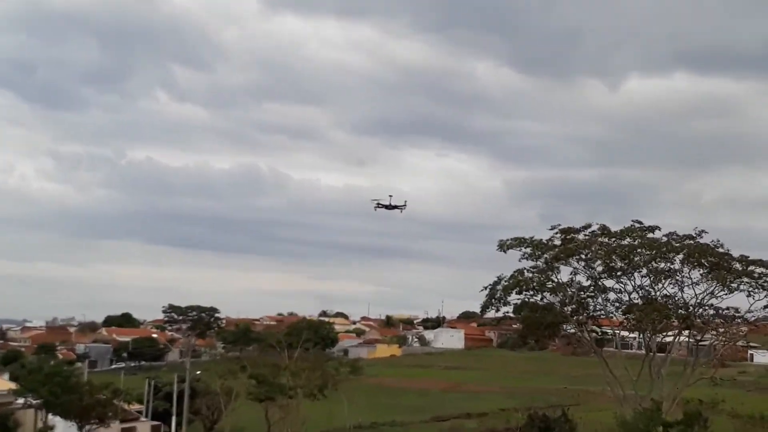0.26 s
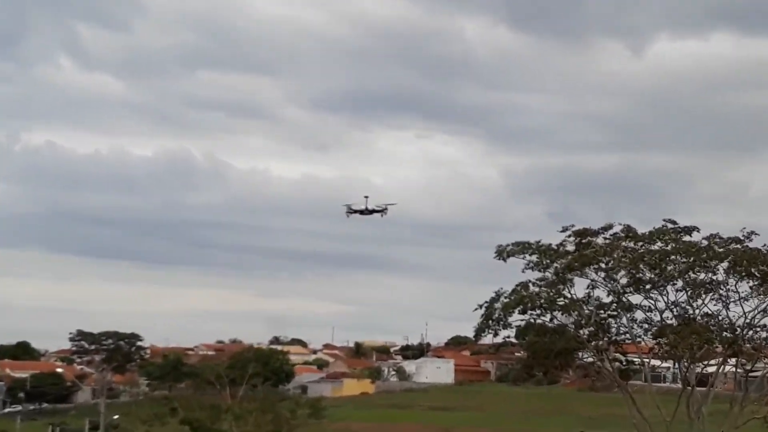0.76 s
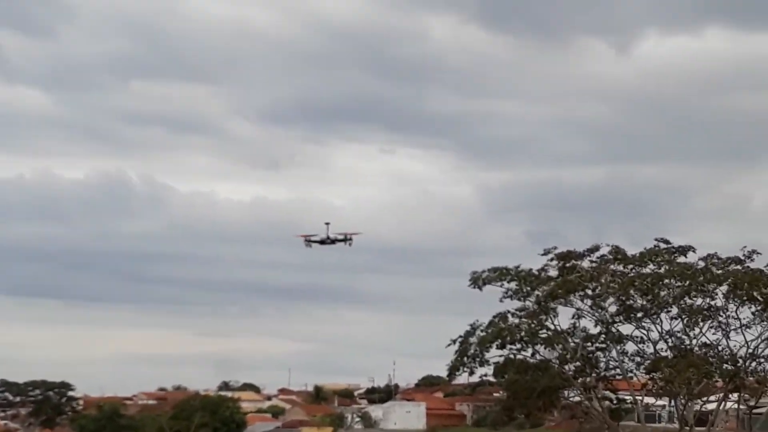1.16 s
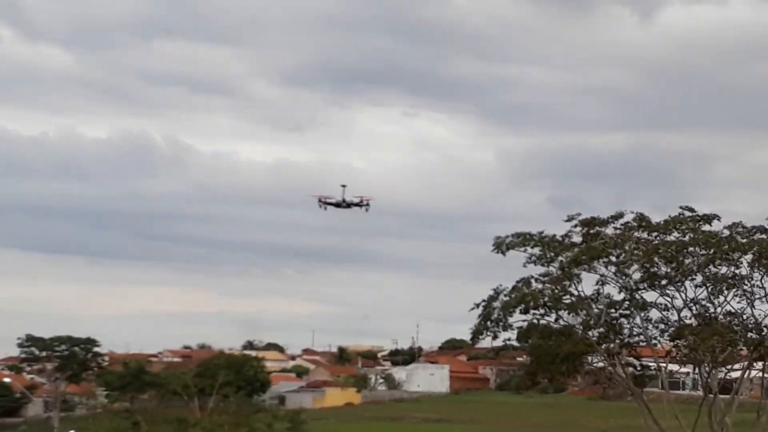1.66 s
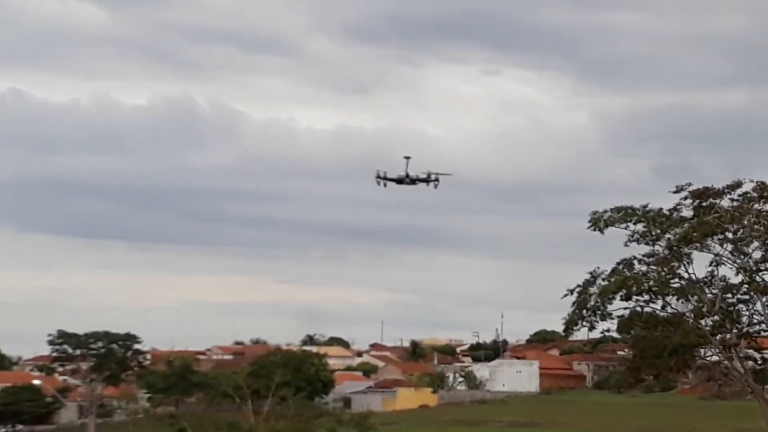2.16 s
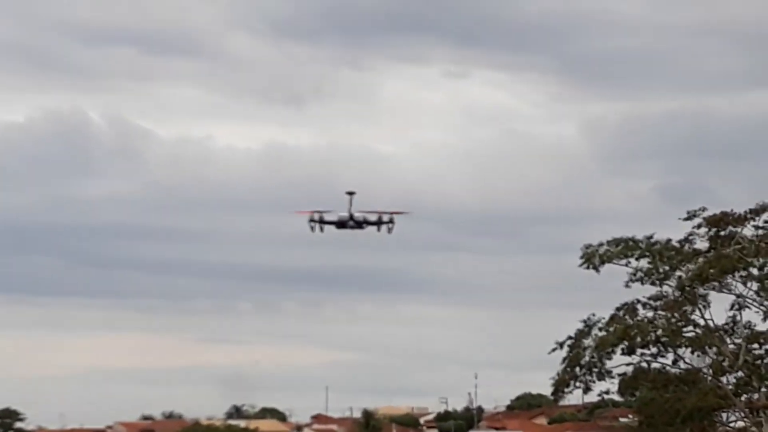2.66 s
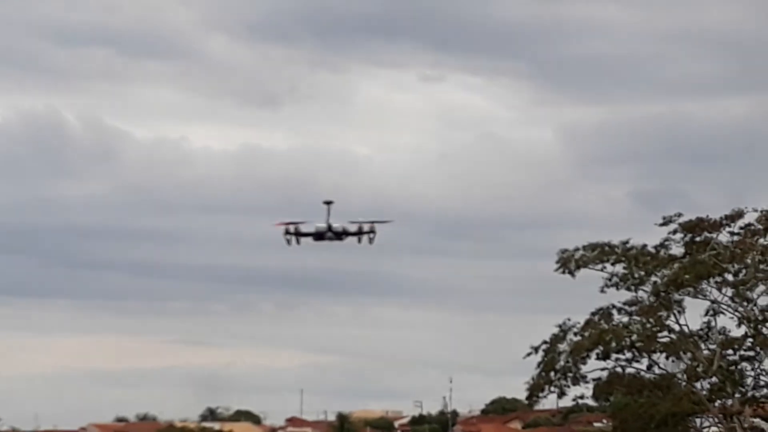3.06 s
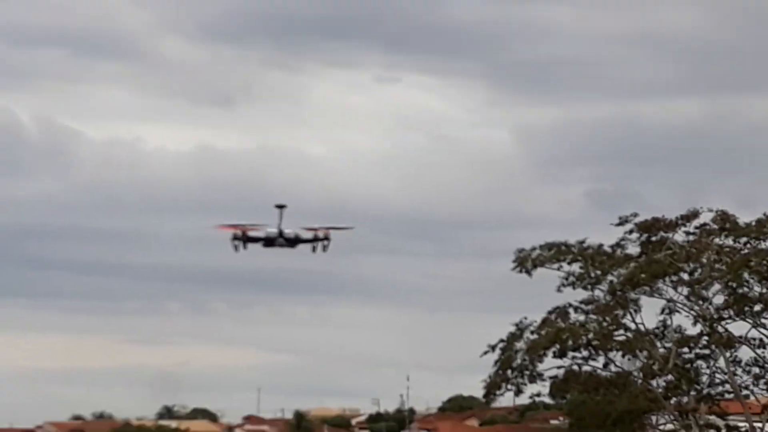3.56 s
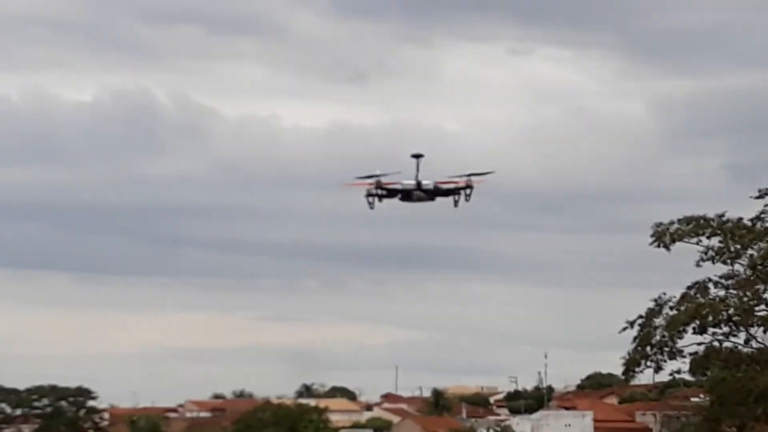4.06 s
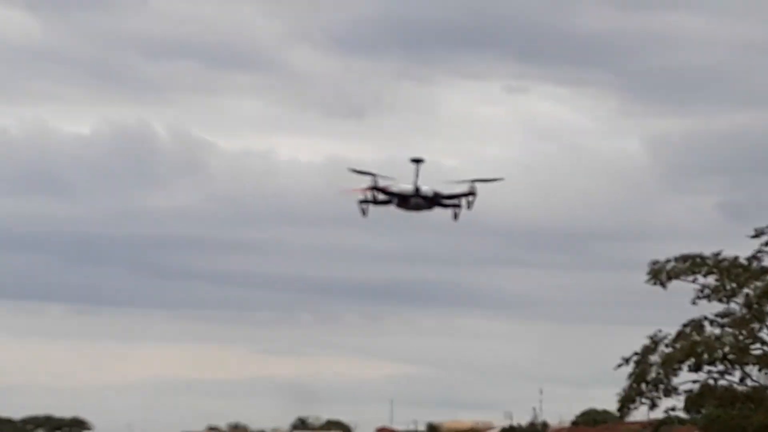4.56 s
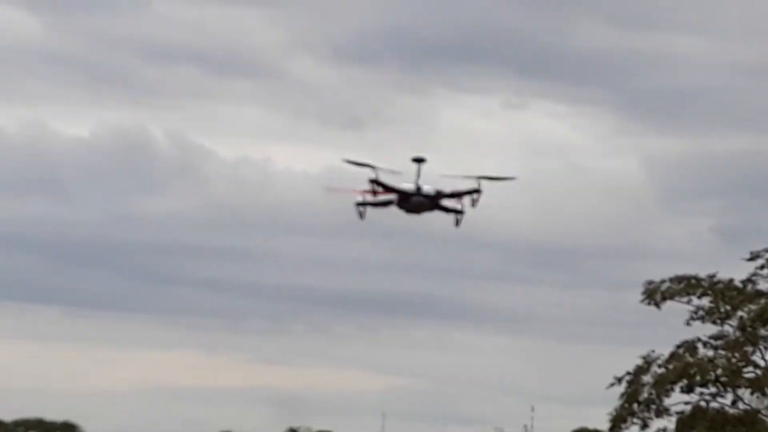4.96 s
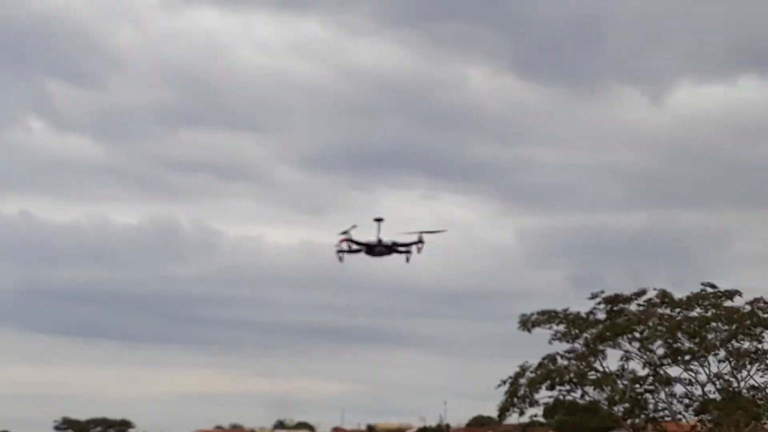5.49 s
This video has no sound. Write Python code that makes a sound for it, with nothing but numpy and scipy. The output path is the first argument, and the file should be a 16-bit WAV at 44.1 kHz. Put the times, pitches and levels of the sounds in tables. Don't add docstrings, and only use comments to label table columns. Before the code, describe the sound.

Steady airy drone buzz with thin motor whine grows louder over about six seconds, interrupted by low, irregular wind bumps.

```python
import sys
import numpy as np
from scipy import signal
from scipy.fft import rfft, irfft
from scipy.io import wavfile
from scipy.ndimage import uniform_filter1d, map_coordinates

SR = 44100
rng = np.random.default_rng(int(sys.argv[2]) if len(sys.argv) > 2 else 0)


def digitize_waveform(pressure):
    field = np.atleast_2d(pressure).T
    bounded = np.clip(field, -1, 1)
    quanta = np.round(bounded * 32767).astype(np.int16)
    wavfile.write(sys.argv[1], SR, quanta)


def to_linear_factor(level_db):
    exponent = np.asarray(level_db, float) / 20
    return 10 ** exponent


N = 252693
T = np.arange(N) / SR

# time [s], nearness [dB], wake turbulence [dB], blade load [dB].
FLIGHT = [(0, -2, 1, 0), (.67, -1.5, 2.5, 1), (.95, -4.5, -0.5, 1), (1.3, -4, 0.5, -4.5),
          (2.1, -2.5, -3, -7), (2.33, -1.5, 1, -10), (2.5, -2, -2, -12), (3.08, -.5, 1, 6.5),
          (3.32, .5, -0.5, -7.5), (3.61, 1, 3, 6.5), (3.97, 4, 1, 2.5), (4.47, 6, -5, 3),
          (4.76, 6.5, -0.5, 3), (5.03, 9.5, 3, 4.5), (5.12, 9.5, -0.5, 3), (5.38, 8.5, -0.5, -6),
          (5.63, 7, -3.5, -4), (5.73, 8, -3, -13)]

# time [s], motor whine [Hz], whine level [dB].
LEAD_ROTOR = [(0, 3830, -55), (.23, 3685, -60), (.6, 3830, -58), (.92, 3935, -54), (1.4, 3855, -58),
              (1.7, 3795, -57), (1.94, 3635, -63), (2.3, 3710, -58), (2.7, 3700, -59), (3.16, 3790, -54),
              (3.6, 3865, -52), (3.88, 3925, -57.5), (4.45, 3815, -49.5), (4.7, 3625, -56),
              (5.04, 3950, -48), (5.27, 3700, -62), (5.52, 3710, -62), (5.67, 3860, -47)]
# middle [s], change of whine [Hz], half length [s].
CORRECTIONS = [
    (1.19, -90, .05),
    (1.55, -115, .055),
    (2.09, 25, .05),
    (2.2, -45, .04),
    (2.58, -20, .05),
    (2.94, 25, .04),
    (3.33, -105, .07),
    (4.03, -125, .055),
    (4.25, -100, .1),
    (4.87, 45, .07),
]
POLE_STEPS = 42
INERTIA_S, LEAD_WOBBLE_HZ, WHINE_DB_PER_HZ = .04, 8, .03

# time [s], shaft rate [Hz], whine level [dB].
SLOW_ROTOR = [(0, 76, -70), (.43, 74.9, -68), (.63, 77.6, -65), (.85, 74.8, -71), (1.4, 75, -72),
              (1.65, 76.6, -67), (2.83, 77.6, -66), (3.4, 75.5, -73), (3.85, 79.5, -66), (4.23, 73.5, -73),
              (4.8, 75.3, -67), (5.05, 79.7, -64), (5.45, 74.6, -70)]
# time [s], shaft rate [Hz], whine level [dB].
FAST_ROTOR = [(0, 90.9, -69), (1.2, 89.8, -64), (1.5, 93.7, -63), (1.85, 92.6, -65.5), (2.2, 92.05, -56),
              (2.9, 93.5, -69), (3.7, 94.9, -66), (4.1, 91.3, -69), (4.45, 92.46, -59), (5.73, 92.8, -63)]
SLOW_WOBBLE, FAST_WANDER, FOURTH_WANDER = .004, .006, .015
FOURTH_SHAFT_HZ = 81.4

# multiple of shaft rate, level [dB].
THRUM = [(2, -11.5), (4, -7.5), (5, -24), (6, -6), (8, -6.5), (10, -7), (12, -17.5), (14, -12), (16, -9.5),
         (18, -15), (20, -13)]
THRUM_SHARE_DB = [-2.5, -4, -6., -8]
THRUM_DB, THRUM_DB_PER_NEAR_DB = -56, 0.87

# frequency [Hz], density [dB per Hz].
HISS = [(150, -14), (250, -8), (380, -2), (1200, -7), (2200, -6.5), (3400, -9), (4500, -7), (5200, -7.5),
        (8900, -7.5), (9500, -10.5), (11000, -11), (13000, -13.5), (15700, -18), (15900, -28)]
# answer to nearness [dB per dB], answer to turbulence [dB per dB].
HISS_ANSWER = [(.6, 1.01), (.95, -0.1), (1.01, 0.28), (1.3, 0.22)]

# time [s], delay [ms], echo strength [0-1].
SURFACE_ECHO = [(0, 1.82, .55), (2, 1.83, .6), (3.5, 1.83, .6), (4.2, 1.95, .65), (4.6, 2.1, .45),
                (4.9, 2.25, .55), (5.73, 2.32, .5)]
# time [s], brightened frequency [Hz], strength [0-1].
HOUSING = [(0, 11300, 0), (2.4, 10700, 0.1), (3, 11500, 0), (3.7, 11000, 0.16), (4.1, 11300, 0.1),
           (4.6, 11920, 0), (4.75, 10700, 0.3), (5.1, 12100, 0.1), (5.73, 12460, 0.1)]

# multiple of shaft rate, level over the main whine [dB].
WHINE = [(42, 0), (56, -13), (63, -14), (84, -13)]
# frequency [Hz], level [dB].
BELL = [(4100, -19), (4280, 3), (4450, -4.5), (4560, 0), (4750, -20)]

# time [s], first tone [Hz], first level [dB], second level [dB].
SWITCHING = [(0, 14216, -65, -72), (.9, 14181, -69, -77), (1.7, 14204, -62, -63), (2.5, 14224, -63, -67),
             (3.15, 14223, -71, -66), (3.6, 14222, -59, -66), (3.95, 14214, -63, -67),
             (4.7, 14205, -54, -57), (5.4, 14152, -57, -55)]
CLOCKS = [1, 1.02235, 1.05152, .98684]
# starting level [dB], rise [dB per s].
HIDDEN_PAIR = [(-83, 2.1), (-90, 2.8)]

# time [s], rumble level [dB].
GUST = [(0, -42), (.17, -43), (.24, -52), (.4, -40.5), (.93, -44), (1.0, -34.5), (1.13, -42.5),
        (1.56, -44.5), (1.63, -30), (2.2, -31.5), (2.32, -31.5), (3.75, -43), (4.1, -61.5), (4.23, -36.5),
        (4.6, -41), (5.45, -47), (5.52, -31.5), (5.73, -37)]
# middle [s], peak [dB], ring [Hz].
EDDIES = [(.062, -25, 103), (.297, -19.5, 162), (0.405, -24.5, 133), (.599, -27, 142), (0.969, -24, 173),
          (1.037, -23, 192), (1.199, -30, 158), (1.471, -25, 153), (1.628, -23, 310), (1.756, -30, 245),
          (1.809, -31, 176), (1.839, -11.5, 185), (1.865, -16.5, 185), (1.959, -18.5, 224),
          (2.03, -24, 198.3), (2.328, -17, 135), (2.35, -19, 137), (2.408, -20, 182), (2.452, -20, 136),
          (2.663, -22.5, 130), (2.843, -26, 142), (2.949, -25, 210), (3.054, -23.5, 109), (3.11, -28, 109),
          (3.324, -26.5, 80), (4.529, -23.5, 156), (4.823, -23, 161), (5.025, -27, 142), (5.518, -25.5, 98),
          (3.644, -26.5, 96)]
# middle [s], peak [dB], ring [Hz].
CRACK = (2.318, -25.5, 520.)
# frequency [Hz], density [dB per Hz].
WIND = [(20, -23), (40, -1.5), (63, 0.5), (90, 5), (125, 2.5), (170, -3), (230, -11)]
# frequency [Hz], density [dB per Hz].
WIND_EDGE = [(180, -7), (260, -1), (350, -5), (500, -19), (800, -23.5)]
WAKE_DB, WAKE_TOP_DB, WAKE_S = -16.5, -39.5, 0.034
SHED_PER_S, SHED_CLEAR_S = 16, .02
SHED_OVER_DB, SHED_SCATTER_DB, SHED_DB_PER_OCTAVE = 9, 2.5, -7
SHED_HZ, SHED_HZ_PER_DB, SHED_OCTAVES = 159.5, 5.5, 0.48

# frequency [Hz], density [dB per Hz].
SIDE_HISS = [(300, -0.5), (2000, 3), (6000, -10.5), (11000, -6.5), (15000, 5)]
# frequency [Hz], level [dB].
PORT = [(20, 0), (9000, 0), (9600, -4), (10300, 0), (22050, 0)]


def curves(table):
    s, *columns = np.transpose(table)
    return [np.interp(T, s, c) for c in columns]


def unit(x):
    return x / np.sqrt(np.mean(x ** 2))


def colour(x, points):
    hz, db = np.transpose(points)
    bins = np.log(np.fft.rfftfreq(N, 1 / SR) + 1)
    gain = to_linear_factor(np.interp(bins, np.log(hz), db, -120, -120))
    return irfft(rfft(x) * gain, N)


def walk(rate):
    hold = int(SR / rate)
    steps = rng.standard_normal(int(N / SR * 400))[:N // hold + 1]
    slewed = uniform_filter1d(np.repeat(steps, hold), hold)
    return 1.3 * uniform_filter1d(slewed, hold)[:N]


def turns(hz):
    return 2 * np.pi * np.cumsum(hz) / SR


def tone(angle, flicker_db, slip, rate):
    level = np.sqrt(2) * to_linear_factor(flicker_db * walk(rate))
    return level * np.sin(angle + slip * walk(rate) + rng.uniform(0, 2 * np.pi))


def delayed(x, seconds):
    return map_coordinates(x, [np.arange(N) - seconds * SR], order=3)


def lead_rotor():
    hz, db = curves(LEAD_ROTOR)
    change = sum(by_hz * np.exp(-((T - s) / half) ** 2 / 2) for s, by_hz, half in CORRECTIONS)
    course = uniform_filter1d(hz, int(INERTIA_S * SR))
    whine_hz = course + change + LEAD_WOBBLE_HZ * walk(rate=20.)
    return whine_hz, db + WHINE_DB_PER_HZ * change


def blades(angles, thrum_db):
    out = 0
    for angle, share_db in zip(angles, THRUM_SHARE_DB):
        for k, db in THRUM:
            db = db + share_db * (1 + k / 8)
            out = out + to_linear_factor(db) * tone(k * angle, flicker_db=3, slip=.9, rate=18.)
    return to_linear_factor(thrum_db) * out


def hiss(angles, band_db, chop=0.27):
    noise = 0
    for angle in angles:
        swing = 1 + chop * np.cos(2 * angle) + chop / 2 * np.cos(4 * angle)
        noise = noise + rng.standard_normal(N) * swing
    noise = colour(noise, HISS)
    edges = [100, 950, 2300, 7000, 11800, 40000]
    bins = np.log(np.fft.rfftfreq(N, 1 / SR) + 1)
    out, swell = 0, walk(rate=4.994)
    for k, db in enumerate(band_db):
        share = np.interp(bins, np.log(edges[k:k + 3]), [k == 0, 1, k == 3])
        part = irfft(rfft(noise) * share, N)
        level_db = db - np.mean(db) + .6 * swell + .8 * walk(rate=14.)
        out = out + to_linear_factor(level_db) * part
    return to_linear_factor(-48.0) * out / np.sqrt(np.mean(noise ** 2))


def echo(x):
    ms, strength = curves(SURFACE_ECHO)
    surface = [(300, -24), (800, -10), (1300, -3), (3200, -1), (4200, -4), (6000, -7), (9000, -16)]  # Hz, dB
    x = x + strength * colour(delayed(x, ms / 1000), surface)
    hz, strength = curves(HOUSING)
    return x + strength * colour(delayed(x, 3 / hz), [(5000, -30), (8500, -1), (22000, 0)])


def motors(angles, whine_db):
    hunting = turns(19 + 3 * walk(rate=8.))
    tremble = .024 * np.sin(hunting) + .012 * walk(rate=50.)
    flutter = 1 + .12 * np.cos(hunting)
    lead_angle = angles[0] + tremble
    lead = sum(to_linear_factor(db) * tone(k * lead_angle, flicker_db=1.5, slip=.3, rate=40.) for k, db in WHINE)
    slow = tone(42 * (angles[1] + tremble), flicker_db=2, slip=.8, rate=40.)
    seventh = tone(49 * lead_angle, flicker_db=2, slip=.5, rate=40.)
    lead = lead + to_linear_factor(-8.) * colour(seventh, BELL)
    fast = tone(49 * angles[2], flicker_db=2, slip=.9, rate=50.)
    bells = unit(colour(rng.standard_normal(N), BELL))
    voices = (flutter * lead, slow, fast + to_linear_factor(-2.) * bells)
    return sum(to_linear_factor(db) * voice for db, voice in zip(whine_db, voices))


def controllers():
    hz, *levels = curves(SWITCHING)
    levels = levels + [db + rise * T for db, rise in HIDDEN_PAIR]
    angle = turns(hz)
    out = 0
    for clock, db in zip(CLOCKS, levels):
        out = out + to_linear_factor(db) * tone(clock * angle, flicker_db=2.5, slip=.3, rate=16.)
    return out


def shed(gust_db):
    timing, tightness, scatter = rng.standard_normal((int(SHED_PER_S * N / SR), 3)).T
    s = (np.arange(len(timing)) + .5 + timing / 3) / SHED_PER_S
    s = np.clip(s, 0, T[-1])
    db = np.interp(s, T, gust_db)
    octaves = SHED_OCTAVES * np.clip(tightness, -2, 1.2)
    hz = (SHED_HZ + SHED_HZ_PER_DB * (db - np.mean(gust_db))) * 2 ** octaves
    db = db + SHED_OVER_DB + SHED_SCATTER_DB * np.clip(scatter, -2, 2)
    db = db + SHED_DB_PER_OCTAVE * np.maximum(octaves, 0)
    crowded = np.abs(s[:, None] - np.transpose(EDDIES)[0]).min(axis=1) < SHED_CLEAR_S
    return list(zip(s, np.where(crowded, -120, db), hz))


def wind():
    gust_db, = curves(GUST)
    wake = 0
    for s, db, hz in EDDIES:
        wake = wake + to_linear_factor(min(db + WAKE_DB, WAKE_TOP_DB)) * np.exp(-((T - s) / WAKE_S) ** 2 / 2)
    rumble_db = 20 * np.log10(to_linear_factor(gust_db) + wake)
    lumps = to_linear_factor(2 * walk(rate=30.))
    rumble = unit(colour(rng.standard_normal(N), WIND))
    edge = unit(colour(rng.standard_normal(N), WIND_EDGE))
    out = lumps * (to_linear_factor(rumble_db - 3.0) * rumble + to_linear_factor(1.254 * gust_db - 8.5) * edge)
    eddies = [*EDDIES, CRACK, *shed(gust_db)]
    phases = rng.uniform(0, 2 * np.pi, (len(eddies), 1))
    for (s, db, hz), phase in zip(eddies, phases):
        near = slice(max(int(s * SR) - 2000, 0), int(s * SR) + 2000)
        cycles = (T[near] - s) * hz * 0.84
        out[near] += to_linear_factor(db) * np.cos(2 * np.pi * cycles + phase) * np.exp(-(cycles / 0.49) ** 2 / 2)
    return signal.sosfilt(signal.butter(2, 65., "high", fs=SR, output="sos"), out)


def scene():
    whine_hz, lead_db = lead_rotor()
    fast_hz, fast_db = curves(FAST_ROTOR)
    near_db, wake_db, load_db = curves(FLIGHT)
    slow_hz, slow_db = curves(SLOW_ROTOR)
    slow_hz = slow_hz * (1 + SLOW_WOBBLE * walk(rate=6.))
    fourth_hz = FOURTH_SHAFT_HZ * (1 + FOURTH_WANDER * walk(rate=3.))
    fast_hz = fast_hz * (1 + FAST_WANDER * walk(rate=12.))
    angles = [turns(hz) for hz in (whine_hz / POLE_STEPS, slow_hz, fast_hz, fourth_hz)]
    band_db = [per_near * near_db + per_wake * wake_db for per_near, per_wake in HISS_ANSWER]
    thrum_db = THRUM_DB + THRUM_DB_PER_NEAR_DB * near_db + load_db
    drone = echo(blades(angles, thrum_db) + hiss(angles, band_db))
    drone = drone + motors(angles, (lead_db, slow_db, fast_db)) + controllers()
    side = to_linear_factor(near_db - 83.5) * unit(colour(rng.standard_normal(N), SIDE_HISS))
    return drone + wind() + side * np.array([[1], [-1]])


def band_limit(x):
    return signal.sosfilt(signal.butter(12, 16880, fs=SR, output="sos"), x)


def record(dry):
    mix = colour(dry, PORT)
    return band_limit(mix)


dry = scene()
out = record(dry)
digitize_waveform(out)
```